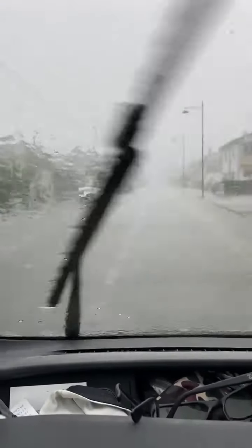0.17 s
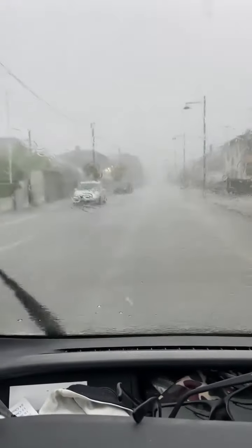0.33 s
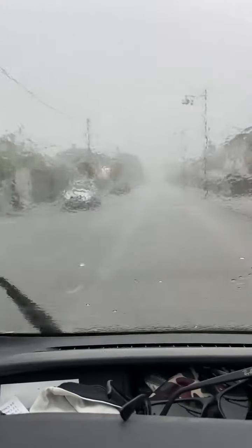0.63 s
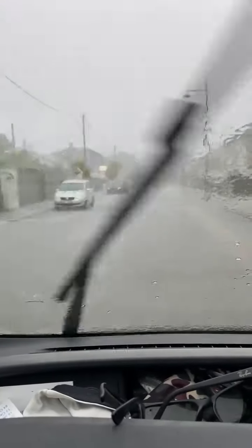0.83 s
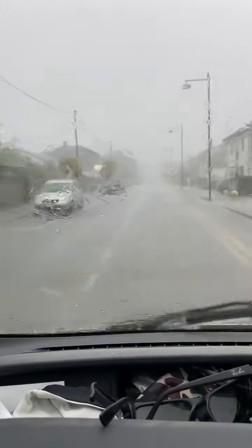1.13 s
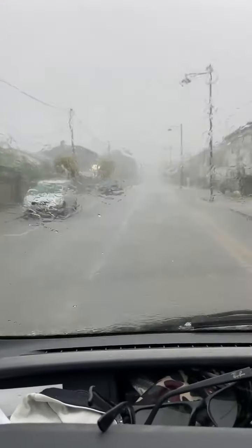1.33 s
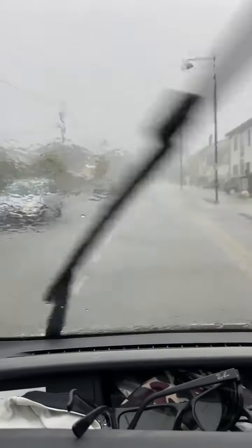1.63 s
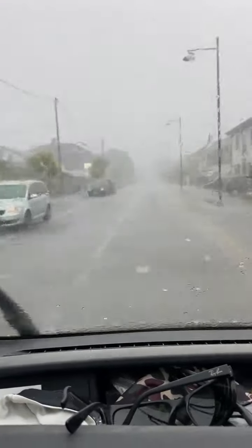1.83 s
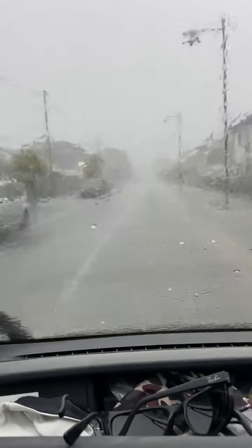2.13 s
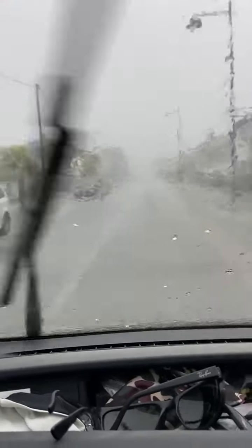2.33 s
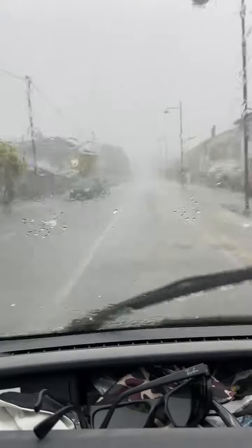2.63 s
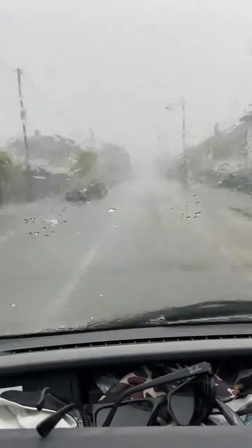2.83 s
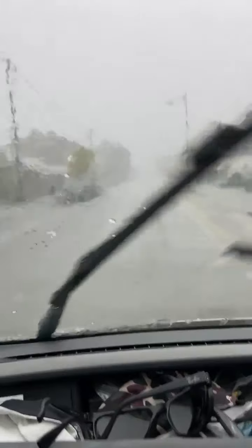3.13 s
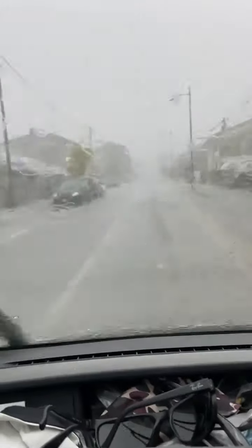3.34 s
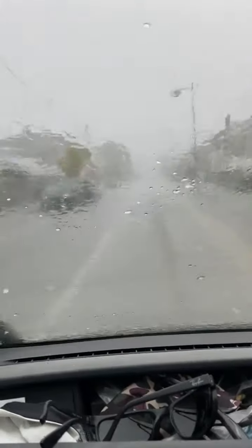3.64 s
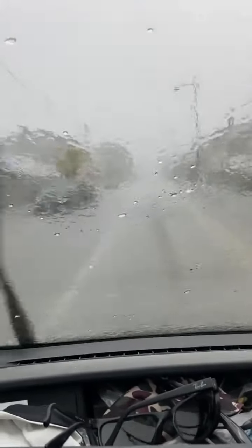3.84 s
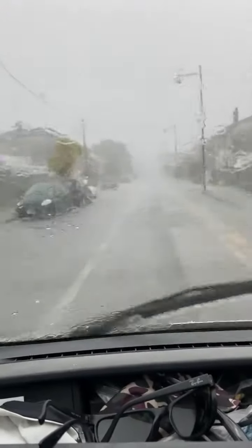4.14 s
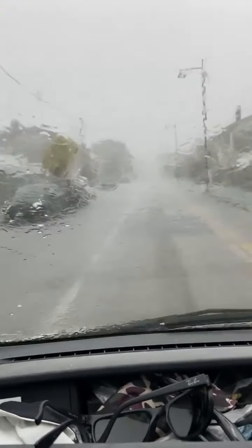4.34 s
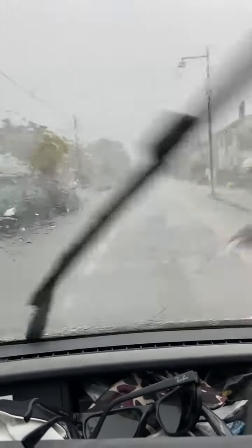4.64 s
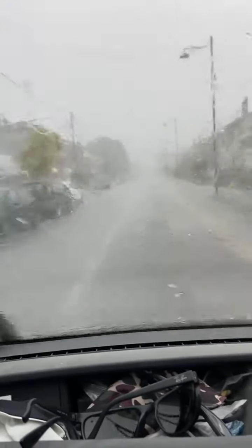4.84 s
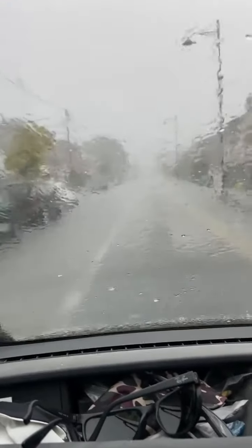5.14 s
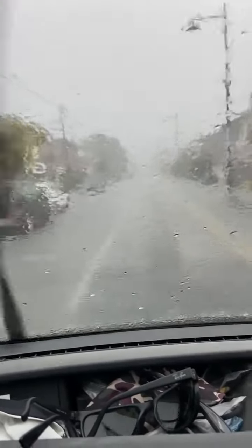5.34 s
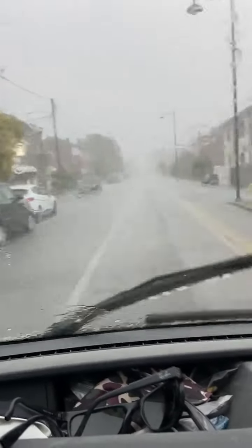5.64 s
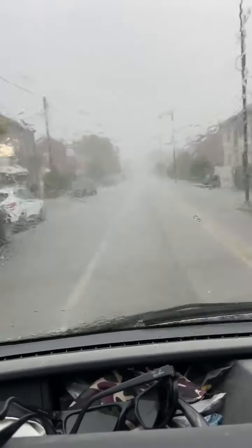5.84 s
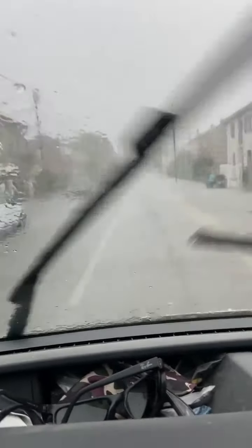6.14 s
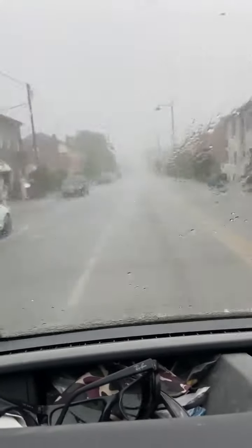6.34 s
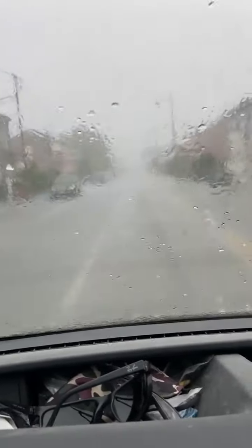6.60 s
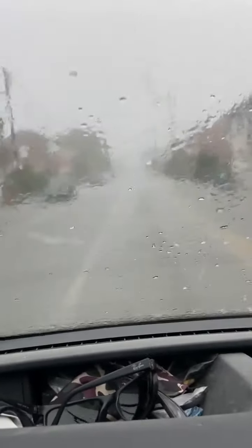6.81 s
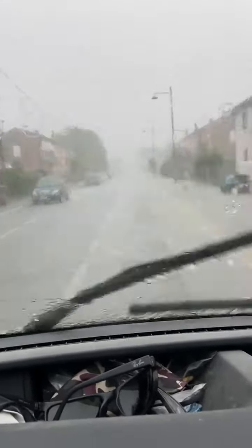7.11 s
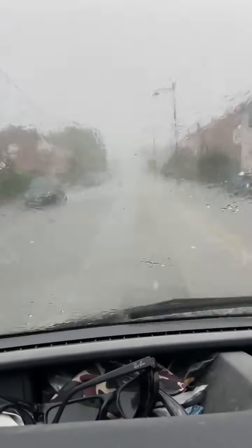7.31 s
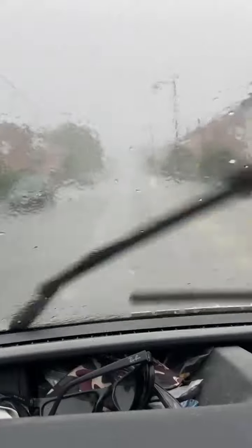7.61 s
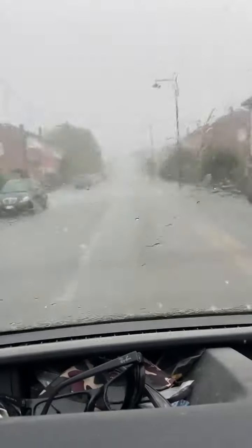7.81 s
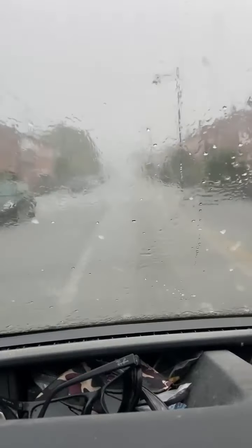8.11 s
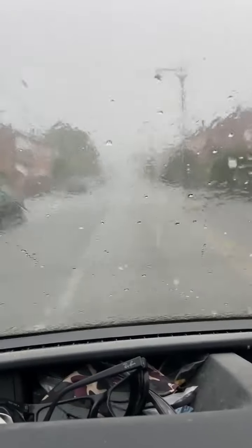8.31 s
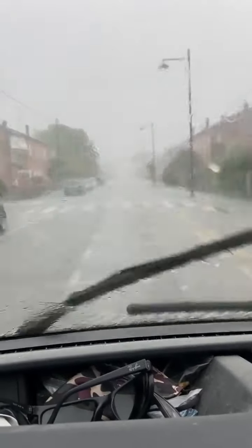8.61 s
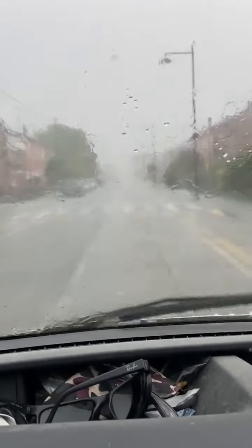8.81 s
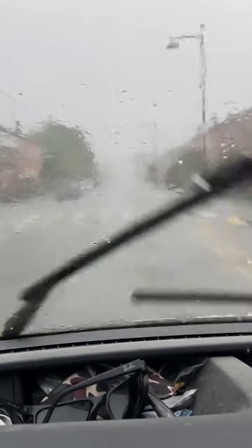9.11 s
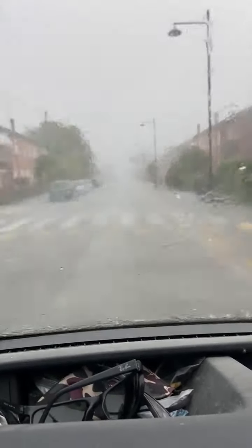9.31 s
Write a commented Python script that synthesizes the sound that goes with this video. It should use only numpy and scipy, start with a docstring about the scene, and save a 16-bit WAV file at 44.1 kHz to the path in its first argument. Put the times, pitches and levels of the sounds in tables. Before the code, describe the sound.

A close stereo perspective inside a car driving slowly through a downpour, about nine and a half seconds. From the start, fat drops smack the windscreen with dry, bright, very short noise bursts, each slightly different in colour, over crackling small drops and a dull wash that surges and dips several times a second. The lined roof drums softly, with heavier muffled knocks clustered in the first 0.7 s and scattered later. Between 0.7 and 3 s the smacks come in looser groups with small gaps. Around 3.1 s two quick puddle slaps hit the wheel arch. From 3.2 s the drops crowd together, staying dense and irregular to the end, with strong flurries near 5.4, 6.9 and 7.7 s. Low tyre rumble wavers beneath; a deep boom swells around 6.1 s, then fades away after 7 s. The rain continues to the cut.

```python
"""Inside a car driving slowly along a town street in a downpour.
Tyres: band-shaped noise rumbles through the body on the flooded road; two puddle slaps hit the wheel arches.
Roof: lined steel, drummed dully by small drops, knocked by heavy ones, shaken by the windscreen's fat drops.
Windscreen: noise bursts ring the glass as fat smacks; small drops and a dull wash of far ones come in flurries."""
import sys
import numpy as np
from scipy import signal
from scipy.fft import rfft, irfft, next_fast_len
from scipy.io import wavfile
from scipy.ndimage import uniform_filter1d, map_coordinates

SR = 44100
rng = np.random.default_rng(int(sys.argv[2]) if len(sys.argv) > 2 else 0)


def pcm_store(signal):
    """Save signal as 16-bit PCM."""
    levels = np.round(np.clip(np.atleast_2d(signal), -1, 1) * 32767)
    wavfile.write(sys.argv[1], SR, levels.astype(np.int16).T)


N = 417186
TIME = np.arange(N) / SR  # s


def from_db(db):
    """Decibels to gain."""
    return 10 ** (np.asarray(db) / 20)


def rms_one(x):
    """Scale to unit rms."""
    return x / np.sqrt(np.mean(x ** 2) + 1e-20)


def in_time(curve, s):
    """Read a (t, level) curve at the given times by straight lines."""
    return np.interp(s, *np.transpose(curve))


def at_hz(table, hz):
    """Read every column of a table on a log-frequency axis."""
    knots, *columns = np.transpose(table)
    return [np.interp(np.log(hz + 1), np.log(knots), column) for column in columns]


def drift(per_s):
    """Smooth random wander with per_s new values a second; rms 1."""
    steps = rng.standard_normal(2048)
    return rms_one(map_coordinates(steps, [TIME * per_s], order=2, mode="mirror"))


# two microphone ports: [f/Hz, likeness/0-1, left lead/rad, left minus right level/dB]
PORT_PAIR = [(130, .995, 0, -.5), (320, .92, -.1, -4.8), (700, .64, .3, -4.5), (1400, .97, 0, 0),
             (2100, .97, 0, 0), (2700, .5, .6, -1.5), (4100, .38, 1.2, -1), (5300, .5, .2, 0),
             (6600, .95, 3.1, 0), (7800, .95, 3.1, 0), (8100, .62, .35, 0)]


def radiate(x, spectrum):
    """Two unrelated signals ring a panel, keep their power and mix into the two ports."""
    size = 2 * next_fast_len(N // 2 + SR // 10)
    hz = np.arange(size // 2 + 1) * SR / size
    # minimum phase: the panel rings only after it is hit
    gain = rms_one(from_db(at_hz(spectrum, hz)[0]))
    cepstrum = irfft(np.log(gain))
    panel = np.exp(rfft(np.r_[cepstrum[0], 2 * cepstrum[1:size // 2]], size))
    common, apart = rfft(x, size) * panel

    alike, lead_rad, balance_db = at_hz(PORT_PAIR, hz)
    alike = np.clip(alike, 0, 1)
    sides = np.array([[1], [-1]])  # left, right
    pair = np.sqrt((1 + alike) / 2) * common + sides * np.sqrt((1 - alike) / 2) * apart
    pair = pair * from_db(sides * balance_db / 2) * np.exp(.5j * sides * lead_rad)
    return irfft(pair, size)[:, :N]


# rain strength, as base level of the patter on the glass: [t/s, level/dB]
RAIN_STRENGTH = [(0.0, -31), (0.32, -23), (0.58, -35), (0.62, -26.5), (0.87, -36.5), (1.06, -35),
                 (1.24, -28), (1.42, -26.5), (1.78, -36), (1.88, -28), (1.92, -38), (2.51, -29.5),
                 (2.57, -42.5), (2.95, -30), (2.99, -40.5), (3.17, -24.5), (3.27, -34), (3.61, -27),
                 (3.71, -33.5), (3.93, -24), (3.97, -32), (4.2, -29.5), (4.48, -33.5), (4.8, -31),
                 (5.11, -37.5), (5.15, -22.5), (5.39, -39), (5.43, -20.0), (5.83, -38), (5.99, -26.5),
                 (6.05, -33), (6.27, -28), (6.55, -29), (6.9, -22.0), (7.04, -33.5), (7.08, -28.5),
                 (7.4, -32), (7.68, -22.5), (7.78, -32.5), (7.83, -22.5), (8.16, -25.5), (8.2, -31),
                 (8.62, -22), (8.78, -34.5), (8.94, -28), (9.42, -23.5)]
MEAN_RAIN_DB = -29  # ordinary rain, from which swings are counted
FILM_DOUBLINGS_PER_DB = .055  # harder rain, thicker water film, longer ring
ATTACK_S, CRACK_S, CRACK_HEIGHT = .0003, .0013, .5  # rise; opening crack: decay, base height re ringing


def strike(drops, ring_s, cabin_db, cabin_s, colour_db, grain_db, treble_db, size=3072):
    """Each drop excites a panel's crowded modes at once: a decaying noise tick plus a brief cabin echo."""
    times_s, crest_db = np.transpose(drops)
    count = len(times_s)
    t = np.arange(size) / SR
    rise = 1 - np.exp(-t / ATTACK_S)
    usual = rise * np.exp(-t / ring_s)

    film = FILM_DOUBLINGS_PER_DB * (in_time(RAIN_STRENGTH, times_s) - MEAN_RAIN_DB)
    stretch = 2 ** (film + .5 * rng.uniform(-1, 1, count))[:, None]

    # sharp taps: the drop breaks up, and its waves return from the panel's edges
    grain = rms_one(uniform_filter1d(rng.standard_normal((count, size)), size=24))
    taps = from_db(grain_db * np.clip(grain, -2, 2))
    ringing = np.exp(-t / (ring_s * stretch))
    crack = CRACK_HEIGHT / stretch * np.exp(-t / CRACK_S)
    burst = rise * (ringing + crack) * taps
    # same energy, short or long
    energy_ratio = np.sum(usual ** 2) / np.sum(burst ** 2, axis=1, keepdims=True)
    burst *= np.sqrt(energy_ratio) / usual.max()
    echo = from_db(cabin_db) * rise * np.exp(-t / cabin_s)
    waves = rng.standard_normal((count, 2, size)) * np.hypot(burst, echo)[:, None]

    # every landing spot favours other modes: random humps along the spectrum
    place = np.sqrt(np.linspace(0, 1, size // 2 + 1))
    humps = np.cos(np.pi * np.outer(np.arange(1, 33), place))
    shape_db = colour_db * rng.standard_normal((count, len(humps))) @ humps
    # the quicker the blow, the brighter
    shape_db += (treble_db - 2 * np.log2(stretch)) * place
    colour = from_db(shape_db)
    colour /= np.sqrt(np.mean(colour[:, place < .5] ** 2, axis=1, keepdims=True))
    levelled = colour * from_db(crest_db)[:, None]
    waves = irfft(rfft(waves) * levelled[:, None], size)

    out = np.zeros((2, N + size))
    starts = np.clip((times_s + ATTACK_S) * SR, 0, N - 1).astype(int)
    for at, wave in zip(starts, waves):
        out[:, at:at + size] += wave
    return out[:, :N]


def shower(level_db, count, sizes_db):
    """Drops of mixed sizes at random times, as hard as it rains just then: rows of (t/s, level/dB)."""
    times_s = np.abs(np.arange(count) + rng.uniform(-1, 2, count)) / count * N / SR
    drop_size = np.clip(rng.standard_normal(count), -2, 1.5)
    return np.column_stack([times_s, np.interp(times_s, TIME, level_db) + sizes_db * drop_size])


# radiation of the car body, relative per Hz: [f/Hz, level/dB]
BODY_SPECTRUM = [(15, -34), (28, -17.5), (47, 0.5), (66, -3.5), (84, 5), (103, 0.5), (130, -5.5),
                 (200, -8.5), (1500, -55.5)]
# deepest body boom, before its wander: [t/s, level/dB]
BOOM_LEVEL = [(0.0, -30.5), (2.0, -34), (3.8, -29), (5.9, -32.5), (6.12, -24), (6.7, -27.5), (7.05, -34),
              (9.46, -46)]
# tyre rumble above the boom, before its wander: [t/s, gain/dB]
ROAD_LEVEL = [(0.0, -19), (0.38, -20), (0.75, -27.5), (1.6, -20.5), (2.3, -27.5), (2.8, -24), (4.85, -25),
              (5.4, -28), (6.2, -27.5), (7.5, -24.5), (8.8, -29)]
# puddle water thrown against the wheel arches: [t/s, relative level/dB]
PUDDLE_SLAPS = [(3.05, -21), (3.148, -18)]
# radiation of the wheel arch, relative per Hz: [f/Hz, level/dB]
ARCH_SPECTRUM = [(250, -6), (600, 6), (1050, -2.5), (2000, -6.5), (14000, -31)]
BOOM_BELOW_HZ = 52.6


def tyres():
    """Road roughness booms unevenly in the cabin's low modes; puddle water slaps the wheel arches."""
    body = radiate(rng.standard_normal((2, N)), BODY_SPECTRUM)
    low_pass = signal.butter(3, BOOM_BELOW_HZ, "low", fs=SR, output="sos")
    high_pass = signal.butter(3, BOOM_BELOW_HZ, "high", fs=SR, output="sos")
    deep = rms_one(signal.sosfilt(low_pass, body))
    upper = signal.sosfilt(high_pass, body)
    boom = from_db(in_time(BOOM_LEVEL, TIME) + drift(10)) * deep
    rumble = from_db(in_time(ROAD_LEVEL, TIME) + drift(11)) * upper
    slaps = strike(PUDDLE_SLAPS, ring_s=.018, cabin_db=-9, cabin_s=.018,
                   colour_db=.2, grain_db=3.0, treble_db=-3)
    return boom + rumble + from_db(2.5) * radiate(slaps, ARCH_SPECTRUM)


# heavy drops on the roof: [t/s, relative level/dB]
HEAVY_DROPS = [(0.175, -22.5), (0.319, -15), (0.333, -22), (0.4395, -16), (0.607, -17), (0.679, -17),
               (1.235, -18.5), (1.428, -20.5), (2.361, -22), (3.768, -22.5), (5.522, -18), (6.698, -23.5),
               (7.518, -17.5), (8.923, -20)]
# radiation of the lined roof, relative per Hz: [f/Hz, level/dB]
ROOF_SPECTRUM = [(70, -0.5), (170, 2.5), (300, -0.5), (352, 4.5), (400, 1), (540, -4.5), (590, -8.5),
                 (635, 0.5), (690, -6), (1100, -7.5), (2000, -11), (6000, -20.5)]
ROOF_DB = -30.5  # overall drumming rms, before the panel
ROOF_FOLLOWS, ROOF_EASES_DB_PER_S = 0.68, 0.47  # share of the rain's swing in dB; slow fall


def roof(rain_db):
    """Lined steel damps the treble: small drops drum, heavy ones knock, the windscreen's fat ones shake it."""
    lining = dict(ring_s=0.0049, cabin_db=2, cabin_s=0.019, colour_db=0.62, grain_db=1.5, treble_db=-8.5)
    force_db = ROOF_FOLLOWS * (rain_db - MEAN_RAIN_DB) - ROOF_EASES_DB_PER_S * TIME
    small = shower(force_db, count=1000, sizes_db=4.0)
    drumming = from_db(ROOF_DB) * rms_one(strike(small, **lining))
    knocks = strike(HEAVY_DROPS, ring_s=0.011, cabin_db=-10, cabin_s=0.019,
                    colour_db=0.35, grain_db=1, treble_db=-14)
    shaken = from_db(-13.5) * strike(FAT_DROPS, **lining)
    return radiate(drumming + from_db(3.0) * knocks + shaken, ROOF_SPECTRUM)


# fat drops on the windscreen, which also shake the roof: [t/s, relative level/dB]
FAT_DROPS = [(0.1137, -9.5), (0.221, -28), (0.2479, -21), (0.2584, -12.5), (0.3871, -12), (0.4395, -13.5),
             (0.4954, -9.5), (0.6061, -11), (0.642, -11.5), (0.9733, -18), (1.0007, -18), (1.0391, -20.5),
             (1.1254, -22.5), (1.2581, -9), (1.3055, -14.5), (1.3619, -15), (1.4128, -11.5), (1.4268, -31),
             (1.7231, -11.0), (1.7336, -8.5), (1.7425, -15), (1.9127, -11), (1.9915, -14), (2.0439, -14),
             (2.1212, -17), (2.2, -10.5), (2.222, -17), (2.2429, -14), (2.3167, -11), (2.3237, -11.5),
             (2.3971, -12.5), (2.4699, -11.5), (2.4873, -12), (2.5163, -16), (2.7358, -7), (2.7717, -20.5),
             (2.8605, -24), (2.9363, -9), (3.0506, -22.5), (3.1219, -15.5), (3.2242, -11), (3.2771, -10.5),
             (3.3244, -11), (3.3379, -11), (3.3614, -9), (3.3698, -17), (3.4202, -14), (3.4666, -14.5),
             (3.4871, -12.5), (3.4926, -13.5), (3.5115, -12.5), (3.5609, -17.0), (3.6068, -8),
             (3.6672, -14.0), (3.6836, -12), (3.7295, -13.5), (3.7669, -9), (3.8263, -9.5), (3.8428, -14),
             (3.8572, -17.5), (3.9031, -11), (3.9101, -13), (3.9206, -9), (4.0034, -14.5), (4.0199, -14.5),
             (4.1012, -11), (4.1246, -14.5), (4.1496, -17.0), (4.197, -13), (4.2648, -16.5), (4.3361, -16),
             (4.5167, -13.5), (4.5985, -11), (4.611, -10.5), (4.6933, -15.5), (4.7008, -14.5),
             (4.7532, -9.5), (4.7776, -10), (4.8076, -16), (4.8585, -13), (4.8774, -13), (4.9358, -12.5),
             (5.1185, -16.5), (5.1348, -14), (5.1752, -22), (5.1972, -20.5), (5.2196, -13), (5.323, -20),
             (5.3743, -13.5), (5.4332, -13), (5.4416, -11), (5.4616, -19), (5.4696, -12), (5.4935, -14),
             (5.519, -12), (5.5259, -16.5), (5.5499, -18), (5.5549, -13), (5.6018, -9.5), (5.6272, -14.5),
             (5.6377, -10.5), (5.7524, -17.5), (5.8587, -12.5), (5.8866, -12.5), (5.9465, -17),
             (5.9709, -17.5), (5.9869, -15), (6.0473, -14.5), (6.0762, -14), (6.1445, -12.5), (6.1495, -17),
             (6.1914, -10), (6.2144, -23), (6.2224, -15.5), (6.2523, -13.5), (6.2668, -14), (6.3331, -18.5),
             (6.3585, -12.5), (6.3775, -15.5), (6.393, -14), (6.4374, -14.5), (6.4803, -11),
             (6.5092, -15.5), (6.5481, -11.5), (6.6085, -17.0), (6.6249, -16.0), (6.6354, -16.5),
             (6.6678, -18.0), (6.7038, -10.5), (6.7666, -13.0), (6.806, -14), (6.8375, -18.5),
             (6.8479, -13), (6.8794, -15.5), (6.9128, -10), (6.9462, -13), (6.9522, -14), (6.9931, -21),
             (7.0195, -16.5), (7.0624, -19), (7.0904, -13), (7.2221, -8.5), (7.265, -18), (7.3184, -12.5),
             (7.4276, -23), (7.4451, -11), (7.4685, -18), (7.5942, -12.0), (7.6272, -11), (7.6371, -17),
             (7.6576, -19), (7.704, -9), (7.8187, -20), (7.8457, -13), (7.8726, -13.5), (7.8821, -20),
             (7.9225, -12), (7.9429, -12.5), (8.0168, -11), (8.0472, -18.0), (8.0617, -10.5), (8.0717, -17),
             (8.0976, -18), (8.148, -13.5), (8.1634, -24), (8.2333, -17.0), (8.2547, -18.5), (8.2981, -14),
             (8.3929, -12.5), (8.5241, -12), (8.5571, -18), (8.5915, -16.5), (8.6129, -10.5),
             (8.6967, -15.0), (8.7022, -14), (8.7212, -11), (8.8289, -11.5), (8.8579, -16.0), (8.8933, -12),
             (8.9157, -12.5), (8.9452, -13.5), (8.9666, -17), (9.0509, -18.5), (9.0973, -12.5),
             (9.1537, -14), (9.1692, -16), (9.1936, -13.5), (9.2151, -17), (9.2729, -15.5), (9.2894, -18),
             (9.3757, -10), (9.3912, -21), (9.4306, -13)]
# radiation of the glass, relative per Hz: [f/Hz, level/dB]
GLASS_SPECTRUM = [(150, -3), (500, -18), (900, -7), (1400, -9), (2200, -0.5), (3100, 3), (4100, 0.5),
                  (5500, 1), (6800, -2), (8300, -6), (13300, -12), (15000, -63)]
CLUMPS_PER_S, CLUMP_DB = 30, 6.5  # random clumping: wander rate, spread


def windscreen(rain_db):
    """Glass rings sharply under fat drops; a crackle and a dull wash swell in clumps and follow the rain."""
    fat = from_db(-0.4) * strike(FAT_DROPS, ring_s=0.0066, cabin_db=-17, cabin_s=0.014,
                                 colour_db=0.8, grain_db=3.0, treble_db=-1)
    clumped_db = rain_db + CLUMP_DB * np.clip(drift(CLUMPS_PER_S), -2, 1)
    small = shower(clumped_db + 0.2, count=1500, sizes_db=3.2)
    patter = strike(small, ring_s=0.0036, cabin_db=-11, cabin_s=0.012,
                    colour_db=0.9, grain_db=2.2, treble_db=-4, size=2048)
    # far drops on bonnet and road blur together and lose treble on the way in
    treble_loss = signal.butter(2, 4800, fs=SR, output="sos")
    wash = signal.sosfilt(treble_loss, rng.standard_normal((2, N)))
    far = from_db(clumped_db - 4.5) * wash
    return radiate(fat + patter + far, GLASS_SPECTRUM)


def scene():
    """Road below, roof above, glass ahead, under one rain."""
    rain_db = in_time(RAIN_STRENGTH, TIME)
    return tyres() + roof(rain_db) + windscreen(rain_db)


CUTOFF_HZ = 16000


def record(dry):
    """Clip peaks beyond full scale, then cut the top steeply."""
    top_cut = signal.ellip(10, .1, 80, CUTOFF_HZ, fs=SR, output="sos")  # order, ripple/dB, stopband/dB
    return signal.sosfilt(top_cut, np.clip(dry, -1, 1))


dry = scene()
out = record(dry)
pcm_store(out)
```